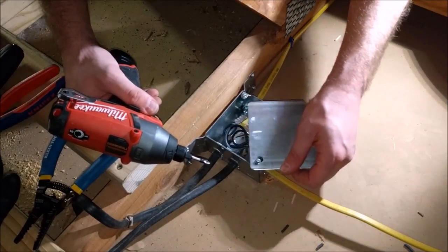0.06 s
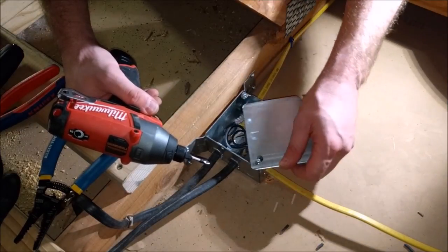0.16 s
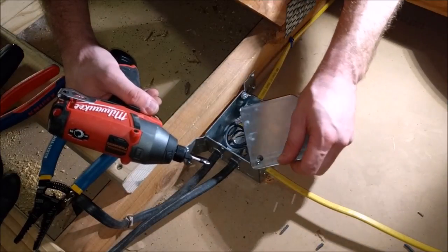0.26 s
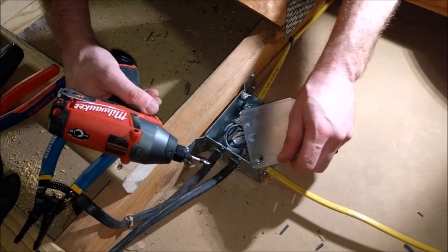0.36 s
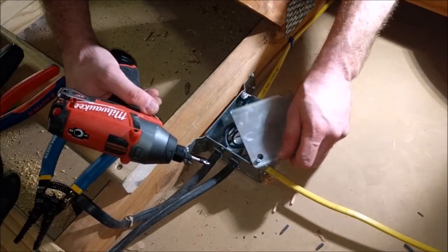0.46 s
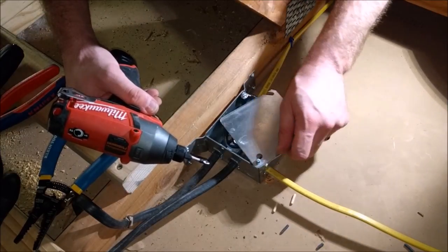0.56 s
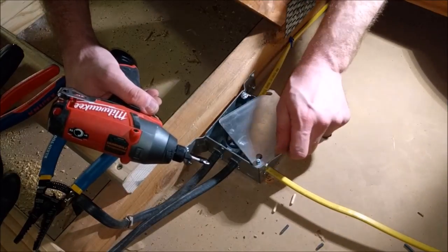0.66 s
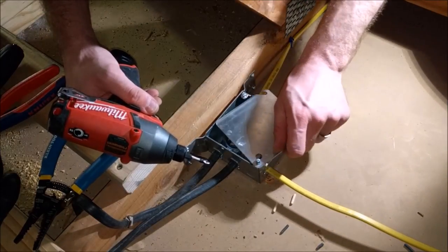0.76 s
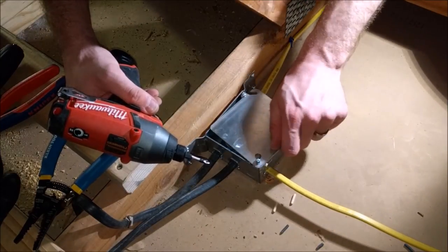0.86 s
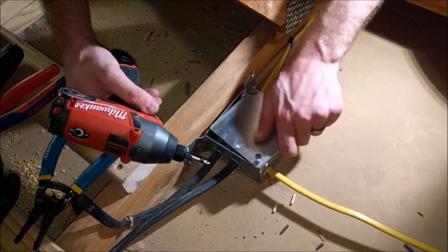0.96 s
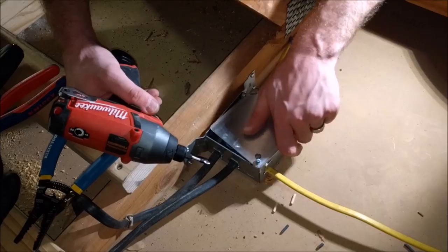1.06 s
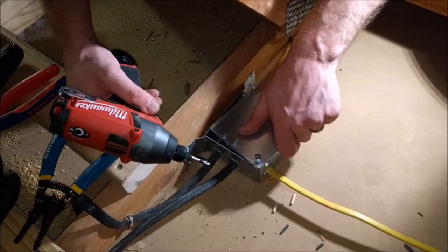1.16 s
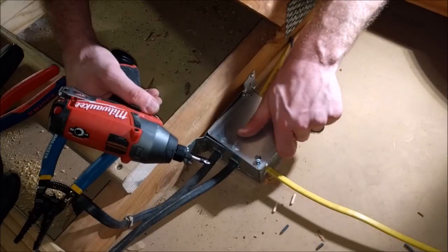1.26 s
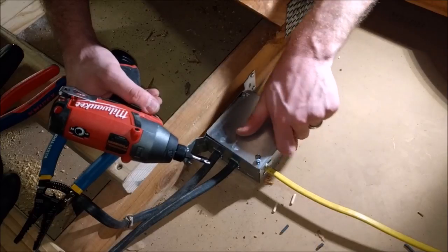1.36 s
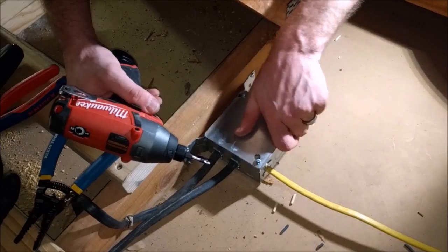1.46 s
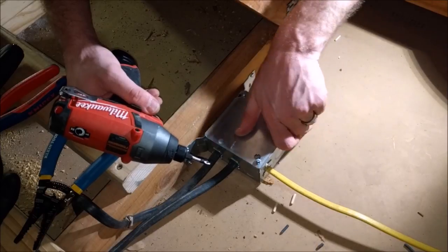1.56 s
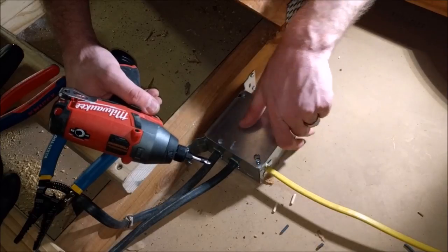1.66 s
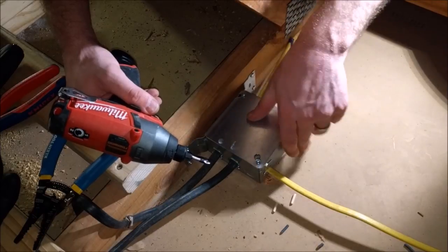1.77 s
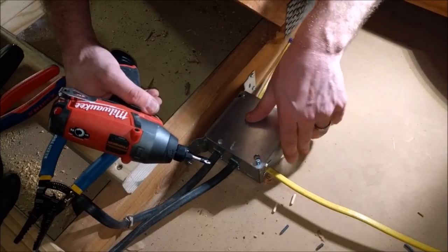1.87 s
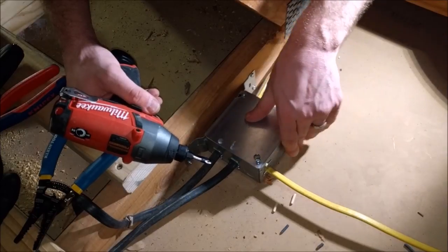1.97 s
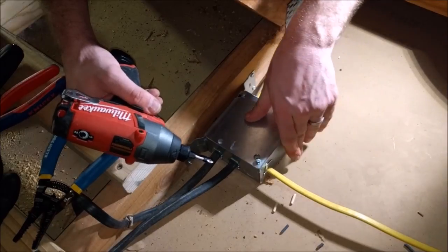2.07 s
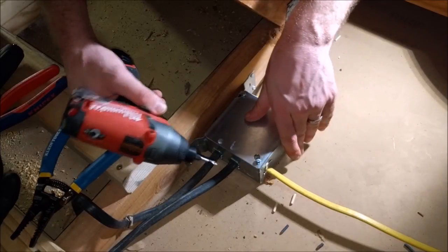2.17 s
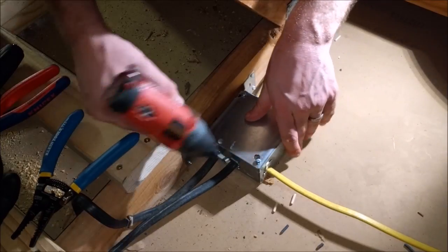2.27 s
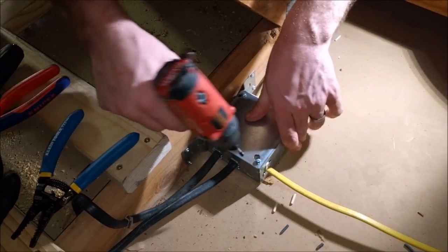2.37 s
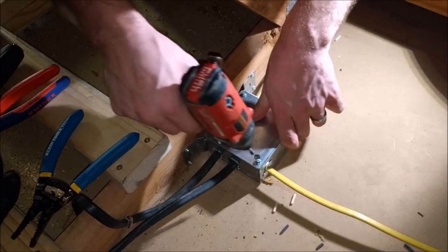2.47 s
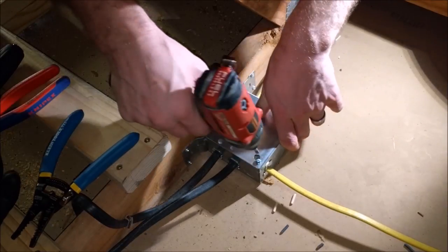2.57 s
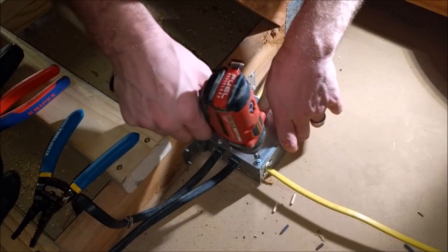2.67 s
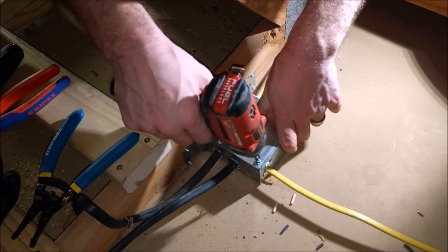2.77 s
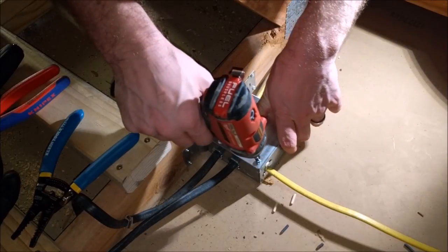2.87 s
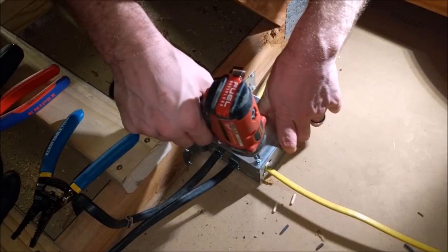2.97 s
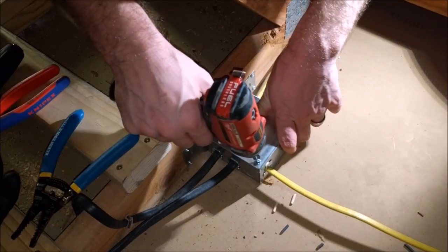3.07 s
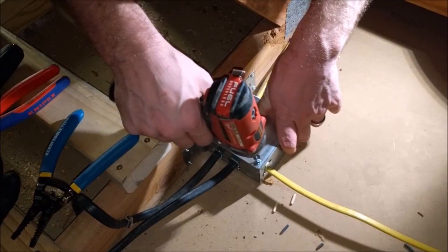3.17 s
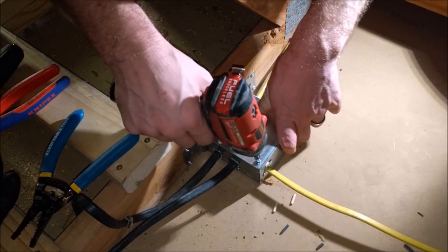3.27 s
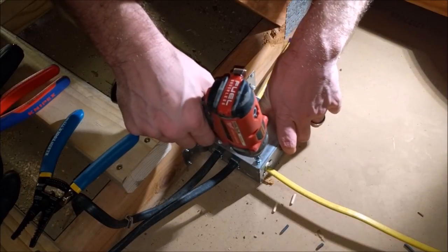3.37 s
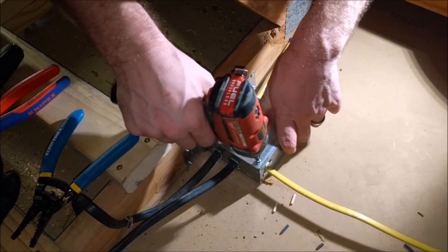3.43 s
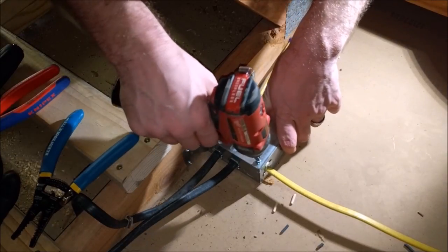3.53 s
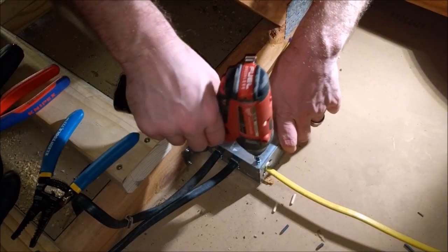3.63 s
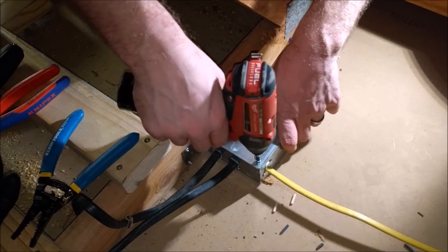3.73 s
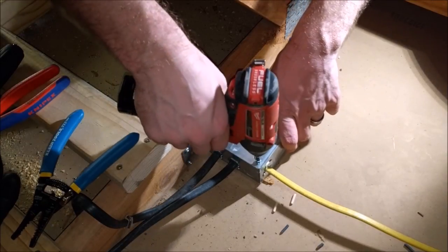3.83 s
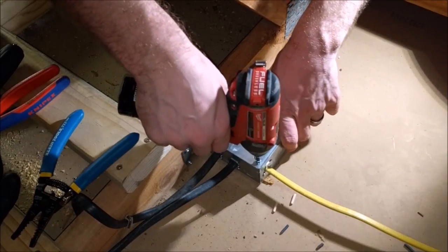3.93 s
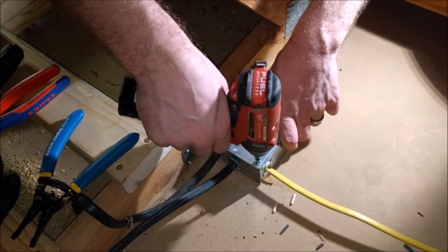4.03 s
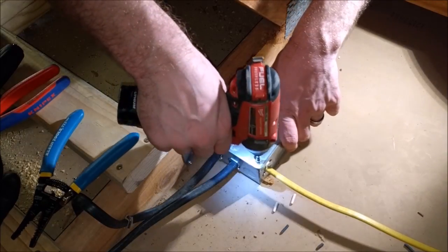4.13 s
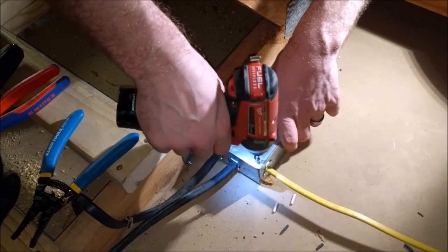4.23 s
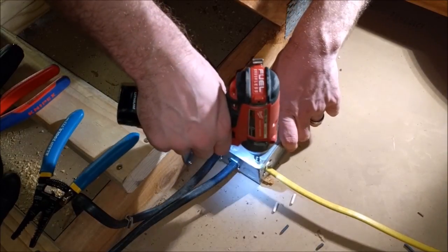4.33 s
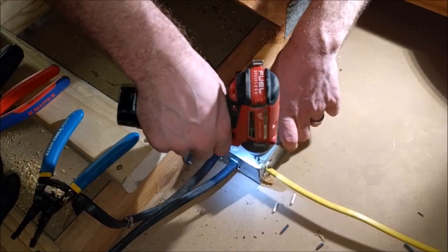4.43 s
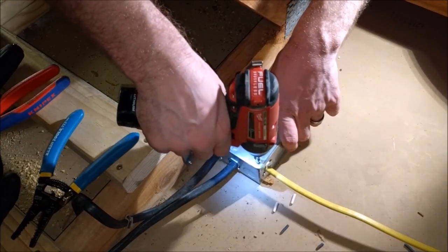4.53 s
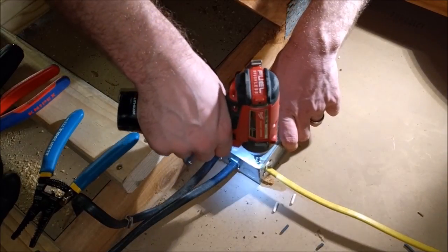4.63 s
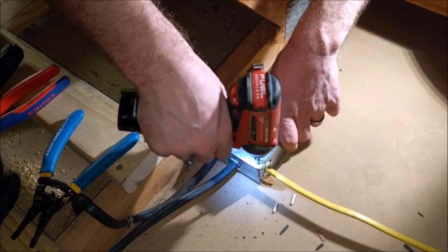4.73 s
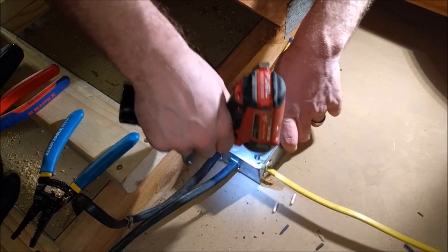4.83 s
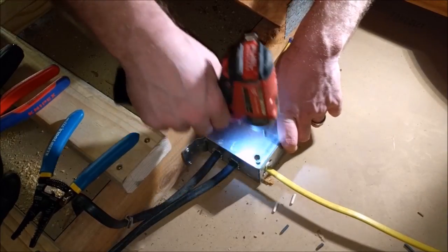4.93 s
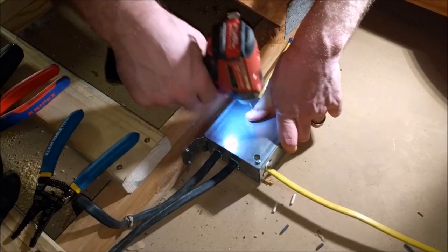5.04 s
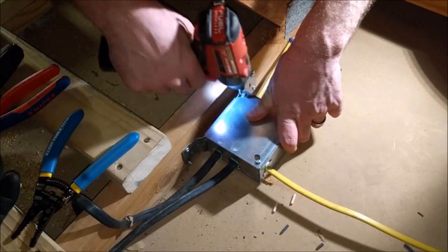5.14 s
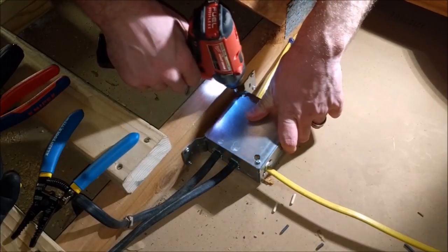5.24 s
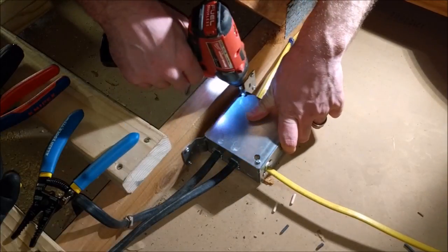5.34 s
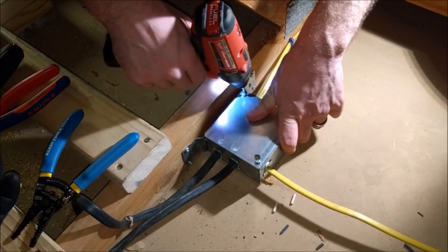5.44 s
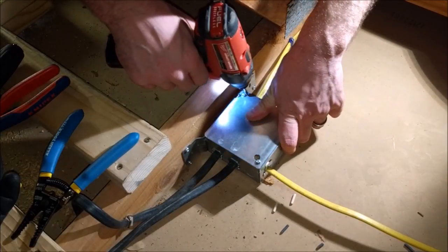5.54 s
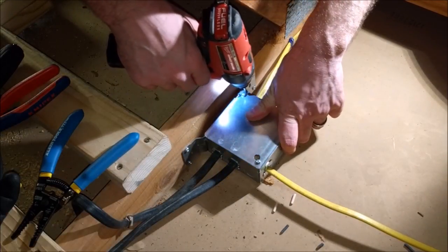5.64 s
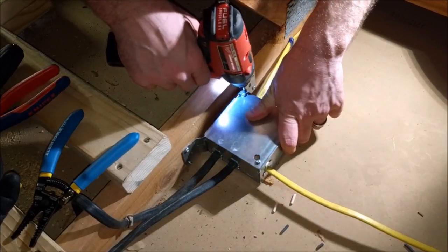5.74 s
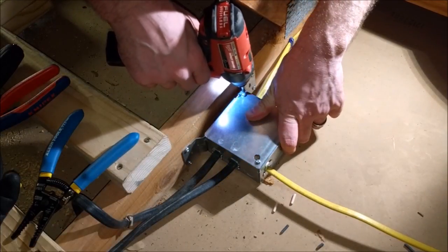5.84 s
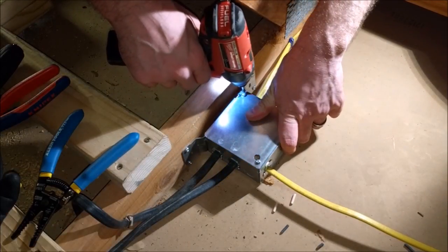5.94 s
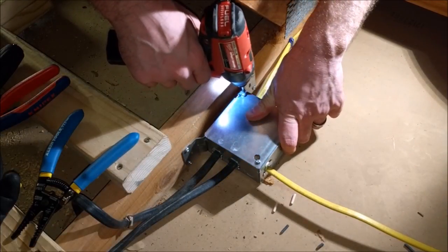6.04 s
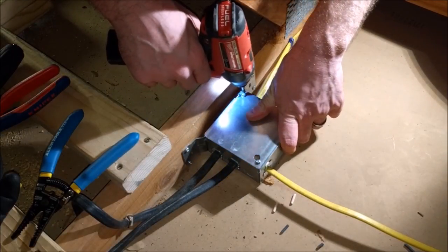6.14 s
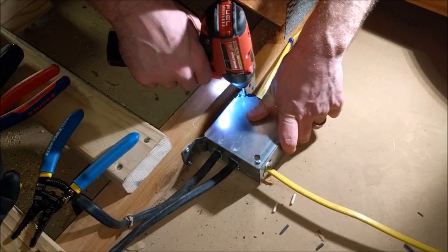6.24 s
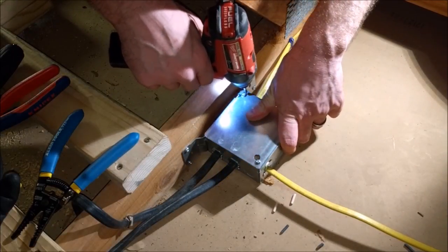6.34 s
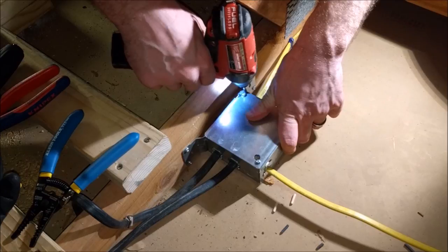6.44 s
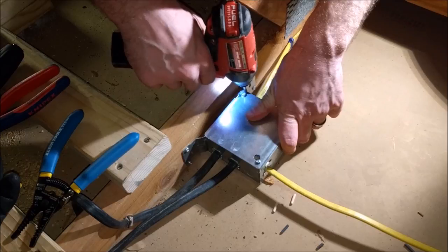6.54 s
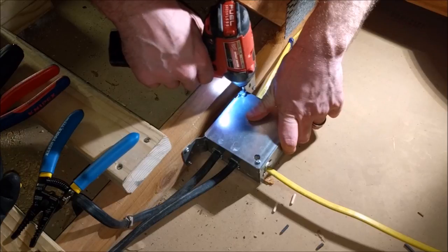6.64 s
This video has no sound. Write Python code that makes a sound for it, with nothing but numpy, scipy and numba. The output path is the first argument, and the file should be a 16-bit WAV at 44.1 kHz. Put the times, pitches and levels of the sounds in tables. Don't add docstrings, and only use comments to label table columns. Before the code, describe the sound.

A close, dry attic scene with quiet air, faint hiss and a short dull echo. From 0 to 0.5 s, soft steel scraping and small taps; at about 0.55 and 0.66 s two loud clanks as a thin cover lands on a metal box. A hard knock near 0.97 s, then clicks, rattles and short scrapes until 2 s as it is pressed home, boards thudding dully underneath. Around 2.3 s light clacks of a lifted tool leave a faint thin ring. Sparse bit taps and low creaks follow from 3 to 3.8 s. At 4.15 s a cordless driver starts with sharp metallic blows, growls and whines roughly, and stops near 4.76 s amid rapid loud hammering and rattling that fade by 4.9 s. A brief scrape and creak, then light irregular clicks from 5.4 to 6.7 s as the bit seeks another screw, without another motor burst.

```python
import sys
import numpy as np
from scipy import signal
from scipy.fft import rfft, irfft
from scipy.io import wavfile
from scipy.ndimage import uniform_filter1d
from numba import njit

SR = 44100
rng = np.random.default_rng(int(sys.argv[2]) if len(sys.argv) > 2 else 0)


def invert_db(x):
    u = np.asarray(x, float) / 20
    return 10 ** u


def wrap_up_sound(samples):
    columns = np.atleast_2d(samples).T
    tamed = np.clip(columns, -1, 1)
    steps = np.round(tamed * 32767).astype(np.int16)
    wavfile.write(sys.argv[1], SR, steps)


N = 295470


def unit(x):
    return x / np.sqrt(np.mean(x ** 2))


def band(x, lo_hz, hi_hz):
    return signal.sosfilt(signal.butter(2, [lo_hz, min(hi_hz, .45 * SR)], "band", fs=SR, output="sos"), x)


def ring(x, hz, t60_s):
    r = np.exp(-np.log(1000) / (t60_s * SR))
    w = 2 * np.pi * hz / SR
    return signal.lfilter([np.sin(w) * np.sqrt(4 * (1 - r))], [1, -2 * r * np.cos(w), r * r], x)


def walk(rate_hz, n=N):
    k = int(SR / rate_hz)
    return uniform_filter1d(np.repeat(rng.standard_normal(n // k + 1), k), k)[:n]


def curves(table):
    s, *columns = np.transpose(table)
    return [np.interp(np.arange(N) / SR, s, c) for c in columns]


# t/s, box peak level/dB, hardness (cover re box)/dB, board re box/dB
COVER_SLID_ON = [(0.003, -38, -1, 6), (0.105, -37, -0.5, -4), (0.226, -27, -20, -11.5),
                 (0.37, -38, -11, -0.5), (0.507, -40.5, 0, -16.5), (0.538, -30, -13, -19.5),
                 (0.551, -8, 1.5, -27.5), (0.588, -18.5, -10.5, -10.5), (0.605, -19, 0.5, -32),
                 (0.631, -19, 3, -20), (0.661, -7.5, 4, -29.5), (0.689, -32, -2, -32),
                 (0.735, -30, -10.5, -30), (0.758, -32.5, -22, -7.5), (0.776, -24, -8, -18)]
COVER_PRESSED = [(0.8416, -30, -0.5, -42), (0.861, -15, -28, -9.5), (0.895, -44.5, -28, -4),
                 (0.915, -37, -1, -25), (0.942, -17.5, 5, -36), (0.953, -24.5, -4, -25),
                 (0.9728, -6, -12.5, -11), (1.038, -28.5, -38, 1.5), (1.247, -47.5, -18.5, 0),
                 (1.285, -21, -10, -36), (1.303, -12, -0.5, -13), (1.346, -23, -1, -3.5),
                 (1.354, -20, -2, -11), (1.466, -21, -7, -19), (1.493, -16, -10.5, -3.5),
                 (1.547, -28.5, -32, -5.5), (1.678, -30, -18.5, -9.5), (1.732, -21.5, -8.5, -12),
                 (1.79, -19, -19, -25), (1.817, -19.5, -14.5, -27.5), (1.832, -22, -7, -24),
                 (1.8535, -11, -16, -29.5), (1.866, -24, 1.5, -19), (1.875, -20.5, 12.5, -19),
                 (1.885, -33.5, 2.5, -24.5), (1.9158, -13, -4, -11), (1.96, -25, -19, -9)]
TOOL_LIFTED = [(2.143, -47.5, -12, -22), (2.299, -22.5, 1.5, -9.5), (2.327, -28, 2, -36.5),
               (2.349, -24.5, -6, -13)]
BIT_PLACED = [(2.46, -57, 18.5, -11), (2.967, -27.5, -10.5, -40), (2.995, -30.5, -12, -34),
              (3.027, -33, -14.5, -27), (3.062, -32.5, -15, -10), (3.096, -31, -1, 3), (3.15, -28, -19, 0),
              (3.303, -55, -7, 15.5), (3.429, -19, -5, -4), (3.534, -26, 3, 6), (3.754, -47, -1.5, 9.5),
              (4.044, -49.5, -6, -10)]
HAMMER_BLOWS = [(4.1653, -48, 3.5, -11), (4.171, -37.5, 3.5, -12.5), (4.186, -20.5, 6, -5),
                (4.2267, -7.5, -13, -19), (4.2621, -4, 2.5, -23.5), (4.279, -15, 1.5, -12),
                (4.696, -27, -4, -23), (4.7335, -8.5, -10, -7.5), (4.754, -11, 4, -23),
                (4.7644, -7, -1.5, -21.5), (4.7805, -13, 4, -22), (4.809, -19.5, -22, -22),
                (4.826, -23, -0.5, -7.5), (4.842, -15.5, -2.5, -6), (4.847, -8.5, -5.5, -19),
                (4.859, -22, -4, -21.5), (4.872, -14.5, 8, -14), (4.895, -30.5, -7, 1.5),
                (4.96, -38, -23, 10), (5.04, -48.5, -24, 8.5)]
BIT_SEEKING = [(5.145, -50.5, -19, -1), (5.419, -28, -8.5, -5), (5.474, -21, -7, -31),
               (5.498, -26.5, -9.5, -39), (5.596, -23.5, -15, -14.5), (5.698, -36.5, -13, -8),
               (5.901, -26.5, 1, -15), (5.914, -33.5, 2.5, -3), (5.999, -37.5, -5.5, 3),
               (6.22, -36, -12, -9.5), (6.259, -26, -29, -22), (6.273, -39.5, 2.5, -35),
               (6.386, -27.5, -21.5, -19.5), (6.51, -26, -5.5, -13), (6.524, -25.5, -34.5, -38),
               (6.575, -56, 2, -17), (6.692, -34.5, 2, -18)]
# contacts, edge re cover/dB, rattle t60/s
ACTIONS = [
    (COVER_SLID_ON, -4, 0.076),
    (COVER_PRESSED, -0.29, 0.069),
    (TOOL_LIFTED, -36, 0.16),
    (BIT_PLACED, -0.5, 0.081),
    (HAMMER_BLOWS, 2, 0.095),
    (BIT_SEEKING, -5, 0.081),
]


def knocks():
    return [(*row, edge_db, t60_s) for rows, edge_db, t60_s in ACTIONS for row in rows]


SLIDES = [.605, .842, .915, .94, 1.305, 1.467, 1.79, 1.817, 1.96, 2.46, 2.995, 3.062, 5.478, 5.9, 6.22,
          6.26, 6.512]


def slides_in(s):
    return np.abs(np.asarray(s)[..., None] - SLIDES).min(axis=-1) < .006


def bursts(times, db, t60_s, rise_s, crack_db=-60):
    crack_t60_s, slide_rise_s = .018, .007
    env, t = np.zeros(N), np.arange(SR // 5) / SR
    for s, d, decay_s in zip(times, db, t60_s):
        i, slide = int(s * SR), slides_in(s)
        fall = invert_db(-60 * t / max(decay_s, .004))
        if not slide:
            fall = fall + invert_db(crack_db - 60 * t / crack_t60_s)
        rise = 1 - np.exp(-t / (slide_rise_s if slide else rise_s))
        env[i:i + len(t)] += (invert_db(d) * fall * rise)[:max(N - i, 0)]
    return env


@njit
def shifting_mode(x, pole, which):
    y, z = np.empty(len(x)), 0j
    for i in range(len(x)):
        z = z * pole[which[i]] + x[i]
        y[i] = z.imag
    return y


def body(force, hz, t60_s, which, scatter_db, detune):
    weight, shift = np.clip(rng.standard_normal((2, len(knocks()) + 1)), -1.3, 1.3)
    r = np.exp(-np.log(1000) / (t60_s * SR))
    pole = r * np.exp(2j * np.pi * hz * (1 + detune * shift) / SR)
    weighted = force * invert_db(scatter_db * weight)[which] + 1e-18
    return np.sqrt(4 * (1 - r)) * shifting_mode(weighted, pole, which)


# f/Hz, width/Hz, level/dB
LOOSE_COVER = [(766, 12, -8.5), (960, 42, -0.5), (1540, 18, -11.5), (1953, 25, -11.5), (2221, 17, -7.5),
               (3000, 12, -26.5), (3110, 25, -17.5), (3600, 36, -15.5), (4185, 25, -15.5), (4530, 31, -3),
               (5120, 46, -13), (5750, 18, -16.5), (7200, 82, -5.5), (7870, 110, -7.5)]
SEATED_COVER = [(745, 13, -18), (840, 36, 0.5), (972, 70, 2.5), (1223, 23, -12), (2080, 18, -13),
                (2300, 35, -23.5), (2730, 15, -17), (3670, 53, -16), (4500, 99, -3), (4910, 110, -8.5),
                (6240, 55, -10), (6800, 36, -7), (7780, 170, -3), (9900, 40, -15)]
TILTED_COVER = [(980, 62, 7), (2090, 34, -12), (2225, 16, -10.5), (3160, 72, -10), (3650, 56, -18),
                (4050, 23, -9), (4380, 40, -12.5), (5050, 210, -25), (5840, 32, -8), (6970, 28, -9.5),
                (7170, 110, -15), (7570, 30, -19), (7880, 130, -13), (8600, 75, -7)]
PRESSED_COVER = [(732, 24, -5), (970, 82, 6.5), (2020, 110, -11.5), (2800, 54, -12), (3540, 41, -19),
                 (3650, 41, -17), (4390, 55, -6), (5020, 53, -17), (6030, 47, -16), (7220, 140, -12),
                 (7900, 120, -14), (8280, 56, -21), (8600, 220, -23), (9100, 210, -22)]
SNAPPED_COVER = [(1000, 85, 6.5), (2283, 40, -15), (2740, 37, -7.5), (3590, 35, -21), (4790, 77, -10),
                 (4940, 51, -11.5), (5400, 67, -9), (6030, 58, -9.5), (6780, 74, -15), (7280, 43, -19),
                 (7960, 34, -9), (8400, 43, -13), (9020, 31, -9), (9960, 91, -5.5)]
TOOL_BODY = [(860, 41, 0), (1280, 63, -8), (1710, 22, -27), (2216, 25, -31), (2500, 51, -2.5),
             (2880, 14, -25), (2910, 15, -0.5), (3140, 61, 3.5), (3670, 96, 0), (3850, 20, -9)]
BIT_HOLDER = [(1253, 24, -3.5), (1620, 21.3, -18), (1826, 65, -1), (2590, 40, -13), (2920, 64, 14),
              (3880, 67, -13), (4000, 52, 5), (5140, 22.1, -33), (8540, 40, -4.5)]
BIT_ON_SCREW = [(1120, 230, 2.5), (1430, 150, -17.5), (1914, 88, -8), (2810, 74, -1.5), (3350, 90, -18),
                (4410, 79, 3.5), (4840, 81, -24), (5700, 27, -16.5), (6560, 47, -17), (7480, 62, -7),
                (8750, 72, -11), (10080, 56, -5.5), (11100, 41, -20), (11460, 87, -9)]
BIT_AT_CORNER = [(1046, 42, -0.5), (1840, 64, -13.5), (2450, 40, -16), (3490, 75, 5), (4830, 88, -10),
                 (6300, 29, -35), (6830, 220, 3.5), (8200, 81, -4), (8600, 47, -27), (8970, 40, -17)]
ANVIL = [(1049, 95, 3.5), (1960, 120, -8), (3020, 70, -8.5), (4385, 150, -3), (4700, 180, -12),
         (5680, 90, -8.5), (6590, 54, -13), (7900, 140, -9.5), (8560, 160, -12.5), (9050, 57, -21),
         (9700, 73, -13.5), (11500, 210, -18), (13880, 150, -16)]
HELD = [
    (0, LOOSE_COVER, 22),
    (.65, TILTED_COVER, 30),
    (.9, SEATED_COVER, 45),
    (1.2, PRESSED_COVER, 60),
    (1.65, SNAPPED_COVER, 60),
    (2.1, TOOL_BODY, 70),
    (2.9, BIT_HOLDER, 45),
    (3.09, BIT_ON_SCREW, 90),
    (4.1, ANVIL, 130),
    (5.3, BIT_AT_CORNER, 70),
]


def held_modes(box, cover, edge, strike, which):
    out = np.zeros(N)
    starts = [int(t * SR) for t, *_ in HELD] + [N]
    for (_, modes, grip_hz), a, b in zip(HELD, starts, starts[1:]):
        stop = min(b + SR // 10, N)
        touching = np.arange(a, stop) < b
        for hz, width_hz, db in modes:
            if hz < 2500:
                force = box
            elif hz < 6000:
                force = invert_db(-3.5) * cover
            else:
                force = invert_db(-3.0) * edge
            push = force[a:stop] * touching * strike[a:stop]
            t60_s = 1.5 / max(width_hz, grip_hz)
            detune = .035 if hz < 1400 else .008
            tone = body(push, hz, t60_s, which[a:stop], 3.5, detune)
            out[a:stop] += invert_db(db - 4 + 2 * (hz > 1400)) * tone
    return out


# t/s, scrape level/dB
DRAG = [(0.0, -28), (.11, -57), (.57, -57), (.6, -18.5), (.71, -40), (.81, -32), (.93, -31.5),
        (1.08, -44.5), (1.72, -57), (1.9, -32), (2.03, -54), (2.74, -67), (3.62, -56), (4.14, -67),
        (4.9, -41.5), (5.22, -61.5), (5.59, -55), (5.75, -65.5), (6.7, -48.5)]


def drags():
    scrape_db = curves(DRAG)[0]
    grit = invert_db(4 * walk(250) + 4 * walk(45) - 2)
    return invert_db([scrape_db - 0.5, scrape_db - 6.5, scrape_db - 4.5]) * grit


def steel():
    box_rise_s, edge_rise_s = .0006, .0002
    s, box_db, cover_db, board_db, edge_db, t60_s = np.transpose(knocks())
    edge_db = edge_db + cover_db
    t60_s = t60_s * 2 ** (-np.clip(cover_db + 3.5, -25, 15) / 75.5)
    which = np.searchsorted(s * SR, np.arange(N))

    drag = drags()
    rattle = invert_db(2.5 * walk(300))
    box = rattle * bursts(s, box_db, 1.13 * t60_s, box_rise_s, crack_db=-12.5) + drag[0]
    cover = rattle * bursts(s, box_db + cover_db, 0.78 * t60_s, edge_rise_s, crack_db=0.0) + drag[1]
    edge = rattle * bursts(s, box_db + edge_db, 1.2 * t60_s, edge_rise_s, crack_db=3.5) + drag[2]
    board = bursts(s + 0.0038, box_db + board_db, 2.53 * t60_s, 0.0088)

    noise = rng.standard_normal((3, N))
    out = invert_db(-10.5) * box * unit(band(noise[0], 1100, 2400))
    out += invert_db(-8.0) * cover * unit(band(noise[1], 2400, 5000))
    out += invert_db(-9.0) * edge * unit(band(noise[2], 5800, 14000))

    strike = invert_db(-3) * rng.standard_normal(N)
    struck = s[~slides_in(s)]
    strike[((struck + box_rise_s) * SR).astype(int)] = invert_db(15)
    damped = .55 * drag
    out += held_modes(box - damped[0], cover - damped[1], edge - damped[2], strike, which)
    return out + board_thuds(board, which) + creaks()


# f/Hz, level/dB, t60/s
BOARDS = [(62, -3, .15), (82, 0, .25), (105, -3, .15), (210, -8, .08), (260, 0, .09), (313, 0, .08),
          (448, -2, .07), (632, -7, .06)]


def board_thuds(board, which):
    force = board * rng.standard_normal(N)
    modes = sum(invert_db(db) * body(force, hz, t60_s, which, 3, .012) for hz, db, t60_s in BOARDS[3:])
    thud = band(board * unit(band(rng.standard_normal(N), 200, 1600)), 250, 510)
    return invert_db(-3) * modes + invert_db(-11) * thud


# t/s, peak level/dB
SHIFTS = [(0.0, -33), (0.599, -35), (1.1, -43), (1.45, -42.5), (1.948, -41), (2.419, -34), (3.209, -34),
          (3.481, -30), (4.312, -28), (4.788, -28.5), (4.931, -21.5), (5.65, -40), (5.95, -35.5),
          (6.7, -33.5)]


def creaks():
    load_db_per_s, settle_db_per_s, rest_db = 138, 76, -47.5
    t = np.arange(N) / SR
    level_db = np.full(N, 1. * rest_db)
    for s, peak_db in SHIFTS:
        fall_db = np.where(t < s, load_db_per_s * (s - t), settle_db_per_s * (t - s))
        level_db = np.maximum(level_db, peak_db - fall_db)
    noise = rng.standard_normal(N)
    modes = sum(invert_db(db) * ring(noise, hz, t60_s) for hz, db, t60_s in BOARDS[:3])
    return invert_db(level_db + 2.5) * unit(modes)


# t/s, turns f/Hz
SHAFT = [(4.16, 395), (4.22, 335), (4.3, 345), (4.398, 336), (4.414, 351), (4.432, 348), (4.478, 321),
         (4.51, 326), (4.54, 355), (4.566, 370), (4.59, 372), (4.616, 367), (4.672, 393), (4.686, 394),
         (4.7, 376), (4.716, 358), (4.74, 356)]
# t/s, growl level/dB, whine level/dB
MOTOR = [(4.15, -30, -34), (4.25, -21.5, -27), (4.4, -21.5, -32.5), (4.5, -19, -34.5), (4.66, -22.5, -28),
         (4.76, -13, -37)]
# multiple of shaft f, level/dB
ORDER = [(1, -26), (2, -6), (2.5, -17.5), (3, 2), (3.5, -14.5), (4, -7.5), (4.5, -16.5), (5, -3),
         (5.5, -13), (6, -9), (6.5, -16.5), (7, -8), (7.5, -16), (8, 3.5), (8.5, -13.5), (9, -2.5),
         (9.5, -10), (10, -7.5), (11, -14), (12, -15)]
# f/Hz, width/Hz, level/dB
HOUSING = [(700, 91, -10), (1038, 310, -0.5), (1630, 120, -14), (2050, 120, -8.5), (2800, 20, -3.5),
           (3000, 64, -8), (3307, 95, 2), (3380, 86, -2), (4015, 140, -11.5), (6340, 200, -9.5),
           (9300, 290, -7)]
# f/Hz, level/dB, from t/s, to t/s
WHINE = [(9655, 0, 4.155, 4.56), (10088, -3, 4.36, 4.75), (9848, -9, 4.56, 4.75), (3300, -3, 4.157, 4.23)]


def driver():
    start_s, stop_s = MOTOR[0][0], MOTOR[-1][0]
    run = slice(int(start_s * SR) - SR // 20, int(stop_s * SR) + SR // 20)
    shaft_hz, growl_db, whine_db = (c[run] for c in curves(SHAFT) + curves(MOTOR))
    t, n = np.arange(N)[run] / SR, len(shaft_hz)
    on = uniform_filter1d(1. * (t > start_s + .015) * (t < stop_s - .015), size=150)

    turn = 2 * np.pi * np.cumsum(shaft_hz * (1 + .006 * walk(30, n))) / SR
    orders = np.zeros(n)
    for k, db in ORDER:
        drift = 1.5 * np.cumsum(walk(45, n)) * 45 / SR + 6 * rng.random()
        orders += invert_db(db + 5.0 * walk(40, n)) * np.sin(k * turn + drift)

    chatter = rng.standard_normal(n) * (1 + .4 * np.cos(turn)) * invert_db(2.5 * walk(300, n))
    housing = sum(invert_db(db) * ring(chatter, hz, 2.2 / width_hz) for hz, width_hz, db in HOUSING)
    fan = unit(band(band(rng.standard_normal(n), 800, 15000), 800, 6500))
    fan += invert_db(-3) * unit(band(rng.standard_normal(n), 8800, 15500))
    growl = unit(band(housing, 1200, 14000)) + invert_db(-10.5) * fan + invert_db(-6.0) * orders

    whine = np.zeros(n)
    for hz, db, from_s, to_s in WHINE:
        gate = uniform_filter1d(1. * (t > from_s) * (t < to_s), size=600)
        tone = np.sin(2 * np.pi * hz * t + 4.3 * walk(30, n))
        whine += invert_db(db + 4.5 * walk(21, n)) * tone * gate

    out = np.zeros(N)
    out[run] = on * invert_db(growl_db - 1.0) * growl + invert_db(whine_db + 2.5) * whine
    return out


# t/s, f/Hz, level/dB, t60/s
THIN_PART = (2.33, 688, -45, 1.1)


def thin_part():
    s, hz, db, t60_s = THIN_PART
    t = np.arange(N) / SR - s
    level = invert_db(db - 60 * np.abs(t) / t60_s + 2. * walk(8.5))
    return (t > 0) * level * np.sin(2 * np.pi * hz * t)


# t/s, peak level/dB
TICKS = [(0.281, -30), (2.7885, -32.5), (3.3018, -32.5), (3.7915, -27.5), (5.3176, -31.5), (5.801, -31.5),
         (6.3214, -35.5)]


def ticks():
    s, db = np.transpose(TICKS)
    env = bursts(s, db, np.full(len(s), .012), .0001)
    return band(env * rng.standard_normal(N), 7200, 15000)


# f/Hz, level/dB per Hz
AIR = [(60, 6), (399, -23.5), (669, -27.5), (902, -26), (1060, -32.5), (2900, -37), (11600, -35.5),
       (16500, -34)]


def air():
    f = np.fft.rfftfreq(N, 1 / SR)[1:]
    hz, db = np.transpose(AIR)
    shape = np.append(0, invert_db(np.interp(np.log(f), np.log(hz), db)) * (f > 150))
    return unit(irfft(rfft(rng.standard_normal(N)) * shape, N)) * invert_db(-52.5 + 3.4 * walk(16.0))


def scene():
    near = steel() + driver() + ticks() + thin_part()
    t = np.arange(SR // 3) / SR
    rafters = band(rng.standard_normal(len(t)), 280, 6900) * invert_db(-60 * t / 0.22) * (t > .004)
    return (near + invert_db(-34.0) * signal.fftconvolve(near, rafters)[:N] + air())[None]


# t/s, kept f/Hz, ..
DROPOUTS = [(.215, 4300), (.655, 2200, 5000), (.726, 2200, 3100, 5800, 7000, 8600),
            (.811, 2200, 3100, 3900, 11300), (1.025, 3700), (1.11, 2900, 5000), (1.195, 6900, 10400),
            (1.512, 1950, 4500), (1.556, 2800), (1.792, 2700, 5000), (1.965, 4100, 6300), (2.21, 2400),
            (2.645, 3500), (2.84, 3500), (2.901, 1400), (2.948, 1500), (3.03, 4300), (3.52, 2900),
            (3.67, 1300), (3.713, 2450), (3.82, 3200), (3.884, 2500), (4.095, 1500),
            (4.25, 1900, 2800, 3400, 4800, 6400, 6800), (4.931, 6600), (5.165, 1500), (5.376, 3800),
            (5.697, 7300), (5.955, 5000), (6.335, 6800), (6.421, 1900)]


def treble_dropouts(x):
    half = int(SR * 1024 / 48000)
    dip = np.hanning(2 * half) ** 2.8
    treble = x - signal.sosfiltfilt(signal.butter(4, 1400, fs=SR, output="sos"), x)
    out = x.copy()
    for s, *bands_hz in DROPOUTS:
        i = slice(int(s * SR) - half, int(s * SR) + half)
        kept = 0
        for hz in bands_hz:
            narrow = signal.butter(2, [hz - 110, hz + 110], "band", fs=SR, output="sos")
            kept = kept + signal.sosfiltfilt(narrow, treble[i])
        out[i] -= .9 * dip * (treble[i] - 2.4 * kept)
    return out


def top_cut(x):
    return signal.sosfilt(signal.butter(12, 16680, fs=SR, output="sos"), x)


def record(dry):
    cut = signal.sosfilt(signal.butter(4, 52, "high", fs=SR, output="sos"), dry[0])
    rounded = np.tanh(0.55 * cut) / 0.91
    top = signal.sosfilt(signal.ellip(8, .3, 60, 15900, fs=SR, output="sos"), rounded)
    return top_cut(treble_dropouts(top)[None])


dry = scene()
out = record(dry)
wrap_up_sound(out)
```